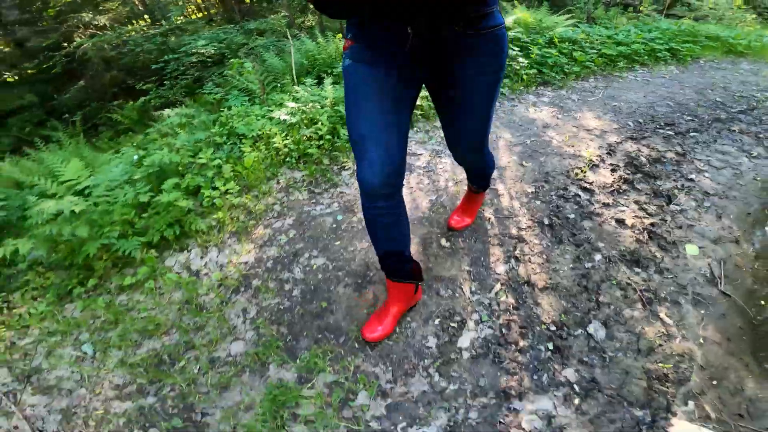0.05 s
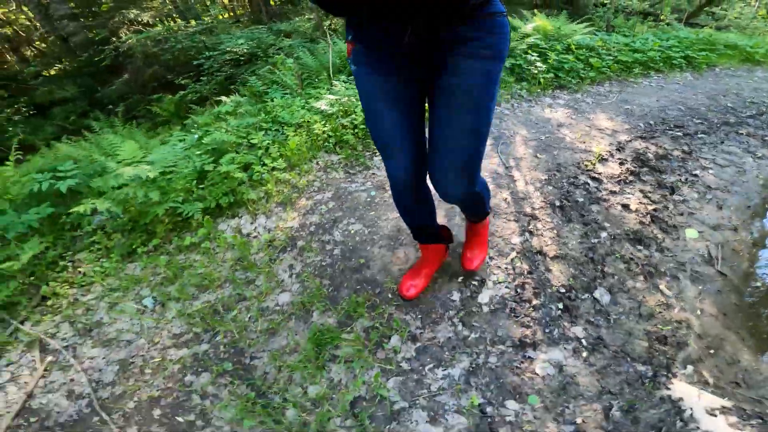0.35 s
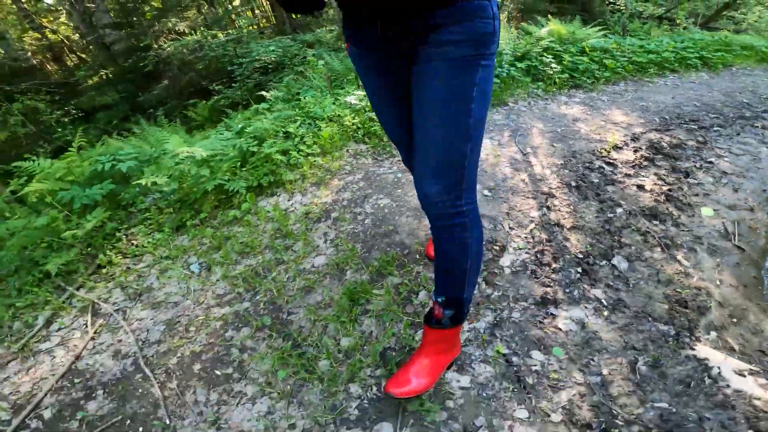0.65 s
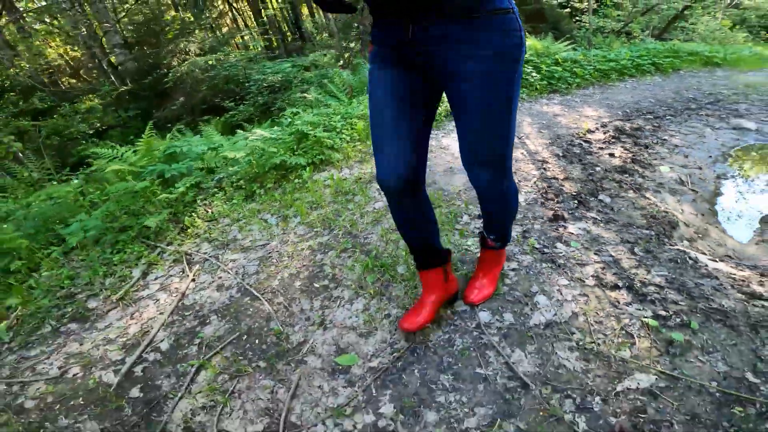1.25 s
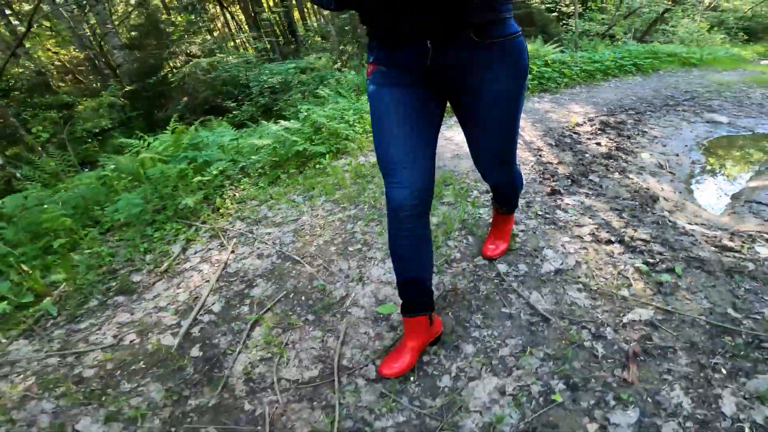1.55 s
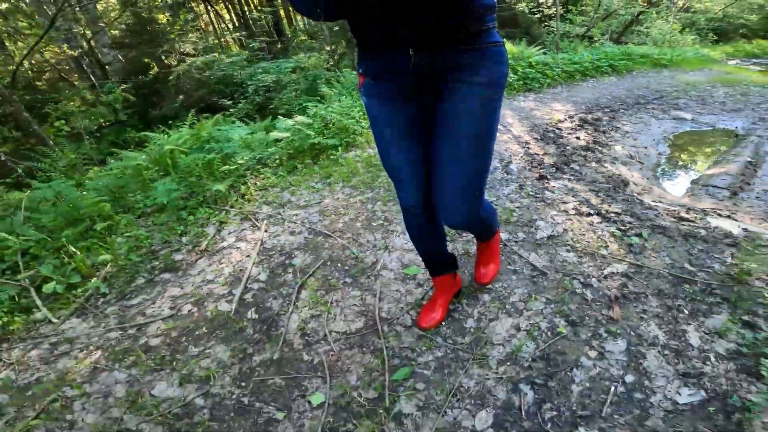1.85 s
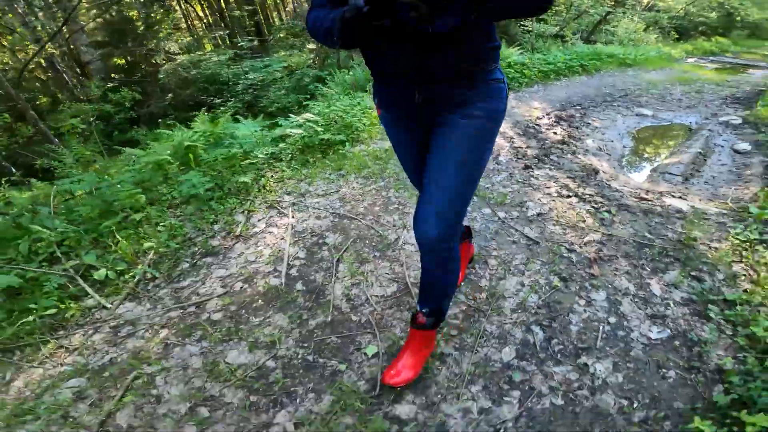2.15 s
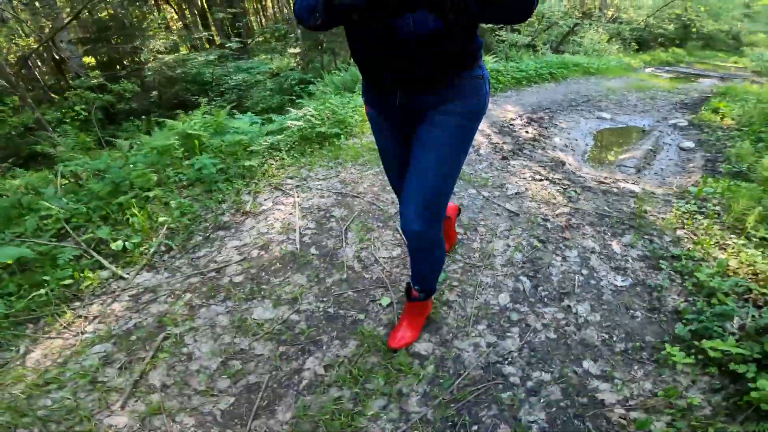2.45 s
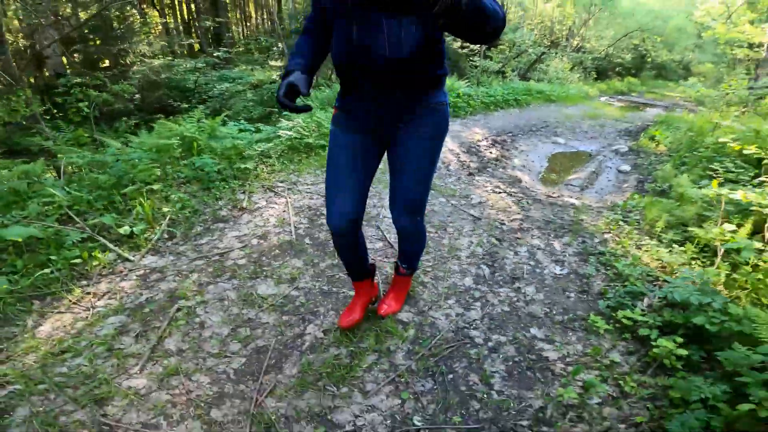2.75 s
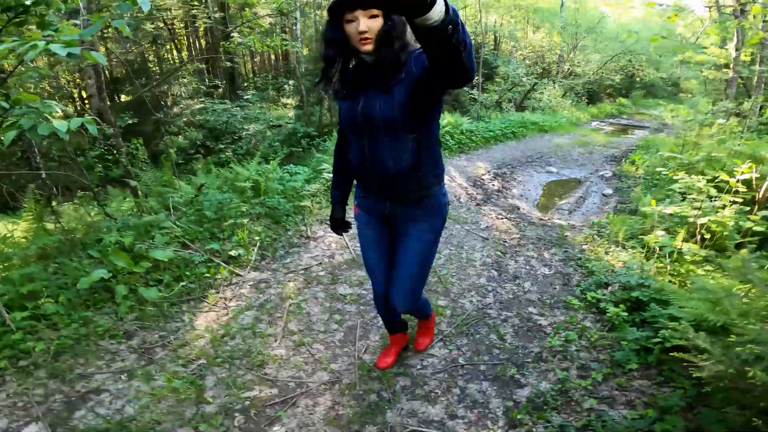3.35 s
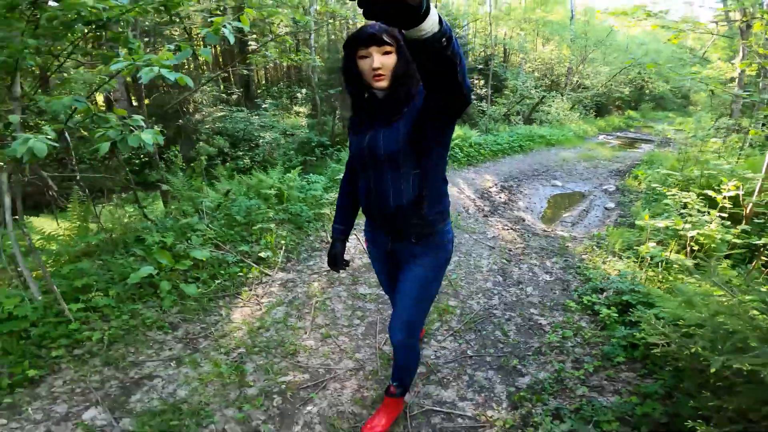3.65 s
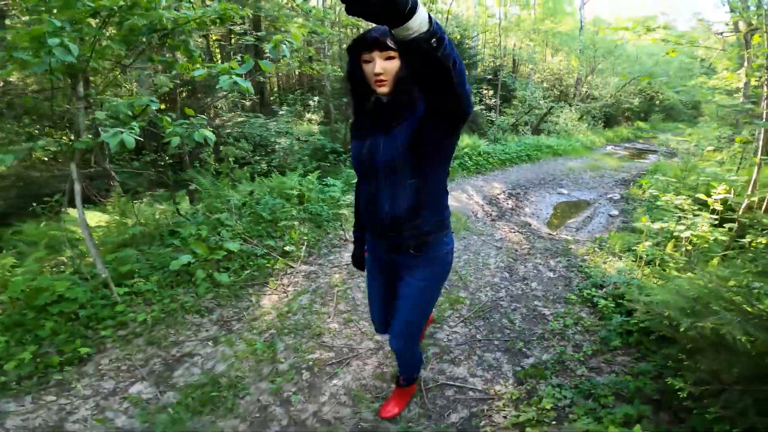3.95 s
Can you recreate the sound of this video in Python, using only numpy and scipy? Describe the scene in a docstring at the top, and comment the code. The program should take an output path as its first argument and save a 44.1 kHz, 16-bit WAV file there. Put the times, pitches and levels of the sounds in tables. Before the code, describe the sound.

A hollow pole creaks and crackles in repeated short bursts, close to the microphone, with dull handling bumps. Underneath, rubber boots scuff leaf litter and snap small twigs on a forest path in faint wind.

```python
"""Forest walk with a creaking pole

Rubber boots on a damp path scuff leaf litter, snap small twigs and pop as their shafts buckle.
The walker carries a hollow pole: it creaks in stick-slip bursts, sings and groans under the glove,
takes soft bumps and shudders at its low bending note. Faint wind stirs the trees, and puffs of air
push on the microphone."""
import sys
import numpy as np
from scipy import signal
from scipy.fft import rfft, irfft, next_fast_len
from scipy.io import wavfile
from scipy.ndimage import map_coordinates

SR = 44100
rng = np.random.default_rng(int(sys.argv[2]) if len(sys.argv) > 2 else 0)


def transcribe(u):
    """Save the signal u as a 16-bit wav file named by the first command-line argument.

    u: samples, shape (n,) or (channels, n), limited to [-1, 1]; the rate is SR.
    q: integer samples, one column per channel.
    """
    v = np.clip(np.atleast_2d(u).T, -1, 1)
    q = np.round(v * 32767).astype(np.int16)
    wavfile.write(sys.argv[1], SR, q)


N = 176400


def amp(db):
    return 10 ** (np.asarray(db) / 20)


def unit_rms(x):
    return x / np.sqrt(np.mean(x ** 2) + 1e-20)


def unit_peak(x):
    return x / np.abs(x).max()


def unit_band(x, low_hz, high_hz):
    """Scale to a spectral rms of 1 within a band."""
    hz = np.fft.rfftfreq(len(x), 1 / SR)
    return x / np.sqrt(np.mean(np.abs(rfft(x)[(hz > low_hz) & (hz < high_hz)]) ** 2))


def curve_at(points, hz):
    """Interpolate (freq_hz, value) points on a log axis."""
    freqs, values = np.transpose(points)
    return np.interp(np.log(hz + 1), np.log(freqs + 1), values)


def clock(size):
    return np.arange(size) / SR


def wobble(rate_hz):
    """Smooth random curve."""
    return map_coordinates(rng.standard_normal(4096), [clock(N) * rate_hz], mode="wrap")


def filtered(x, response):
    """Apply a frequency response."""
    size = next_fast_len(N + SR // 2)
    return irfft(rfft(x, size) * response(np.fft.rfftfreq(size, 1 / SR)), size)[..., :N]


def minimum_phase(gain, size=2048):
    """Causal impulse response of energy 1, shaped by gain(hz)."""
    cepstrum = irfft(np.log(np.maximum(gain(np.fft.rfftfreq(size, 1 / SR)), 1e-6)))
    cepstrum[1:size // 2] *= 2
    cepstrum[size // 2 + 1:] = 0
    impulse = irfft(np.exp(rfft(cepstrum)))
    return impulse / np.linalg.norm(impulse)


def convolve(x, impulse):
    return signal.fftconvolve(np.atleast_2d(x), np.atleast_2d(impulse), axes=1)[:, :N]


def add(track, start_s, sound):
    part = track[..., max(round(start_s * SR), 0):][..., :sound.shape[-1]]
    part += sound[..., :part.shape[-1]]


def swell(start_s, hold_s, attack_s, release_s):
    """Exponential rise up to start_s, hold, exponential fall."""
    t = clock(N)
    return np.exp(-np.maximum(start_s - t, 0) / attack_s - np.maximum(t - start_s - hold_s, 0) / release_s)


def burst(decay_s, size=1024):
    """Decaying noise of energy 1."""
    noise = rng.standard_normal(size) * np.exp(-clock(size) / decay_s)
    return noise / np.linalg.norm(noise)


def grains(rate_hz, spread_db, noise_gain):
    """Two rows of tiny, uneven random impacts on a bed of noise."""
    hits = (rng.random((2, N)) < rate_hz / SR) * rng.choice([-1, 1], (2, N))
    sizes = amp(spread_db * np.clip(rng.standard_normal((2, N)), -2, 2))
    return unit_rms(hits * sizes) + noise_gain * rng.standard_normal((2, N))


# Stereo likeness: freq_hz, correlation
COHERENCE = [(60, 0.73), (300, 0.63), (2000, 0.9), (5000, 0.53), (12000, 0.17)]
# Stereo balance: freq_hz, left_minus_right_db
BALANCE = [(60, -2), (200, 2), (400, -4.5), (800, -0.5), (1300, 0), (2400, 2.5), (4400, 1.5), (9000, -2.5)]


def stereo(pair, spectrum):
    """Colour two unrelated rows and blend them into stereo of rms 1."""
    def mid_side_gain(hz):
        angle = np.arccos(np.clip(curve_at(COHERENCE, hz), -1, 1)) / 2
        return amp(curve_at(spectrum, hz)) * [np.cos(angle), np.sin(angle)]

    mid, side = filtered(pair, mid_side_gain)
    left_right = np.array([mid + side, mid - side])
    return unit_rms(filtered(left_right, lambda hz: amp(np.outer([.5, -.5], curve_at(BALANCE, hz)))))


# Wind spectrum: freq_hz, gain_db
WIND_SPECTRUM = [(25, -3.5), (55, -12.5), (110, -26.5), (190, -15.5), (300, -25.5), (650, -29), (900, -30),
                 (1200, -24), (1600, -28), (2700, -26.5), (3900, -30.5), (6200, -37.5), (9000, -45.5),
                 (15500, -61)]
# Crisp leaf spectrum: freq_hz, gain_db
LEAF_SPECTRUM = [(2000, -43), (4500, -5), (7000, 1.5), (9000, -2.5), (10500, -9), (12500, -7.5),
                 (15500, -49)]


def forest_wind(wind_db=-53, ticks_db=-80):
    """Faint wind in the trees, with sparse ticks of leaves."""
    wind = amp(wind_db + wobble(5.32)) * stereo(rng.standard_normal((2, N)), WIND_SPECTRUM)
    ticks = stereo(grains(rate_hz=40, spread_db=15, noise_gain=.05), LEAF_SPECTRUM)
    return wind + amp(ticks_db) * ticks


# Crushed litter spectrum: freq_hz, gain_db
CRUNCH_SPECTRUM = [(200, -13.5), (650, -2.5), (1250, 5.5), (1600, -2), (3000, -2), (3850, -3), (4600, -7.5),
                   (7000, -15), (11000, -35)]
# Boot scuffs: start_s, hold_s, crunch_db, hiss_db
BOOT_SCUFFS = [(0, 0.28, -54.5, -71.5), (0.293, 0.052, -60, -70), (0.898, 0.032, -50, -56.5),
               (0.983, 0.046, -48.5, -59), (1.07, 0.1, -62.5, -71.5), (1.212, 0.15, -62, -68),
               (1.506, 0.11, -50, -67.5), (1.657, 0.044, -54.5, -68), (1.74, 0.016, -52, -60.5),
               (1.822, 0.056, -50, -72), (2.037, 0.05, -46, -56.5), (2.235, 0.15, -61, -66.5),
               (2.37, 0.13, -58, -70), (2.507, 0.18, -53.5, -78), (2.844, .13, -59, -69.5),
               (3.0, 0.21, -52, -75), (3.106, 0.013, -64, -60), (3.241, 0.32, -60.5, -68),
               (3.846, 0.085, -56, -69.5), (3.937, 0.057, -55, -69)]


def boot_scuffs(attack_s=0.0071, release_s=0.032):
    """Each scuff crushes leaves and grit."""
    crunch = stereo(grains(rate_hz=1000, spread_db=5, noise_gain=.6), CRUNCH_SPECTRUM)
    crunch *= amp(2 * wobble(70))
    hiss = stereo(grains(rate_hz=700, spread_db=6, noise_gain=.5), LEAF_SPECTRUM)
    hiss *= amp(2.5 * wobble(70))
    return sum(swell(start_s, hold_s, attack_s, release_s) * (amp(crunch_db) * crunch + amp(hiss_db) * hiss)
               for start_s, hold_s, crunch_db, hiss_db in BOOT_SCUFFS)


# Pole body modes: freq_hz, gain_db, t60_s, left_minus_right_db
BODY_MODES = [(171.4, -10.5, 0.45, 7), (217.7, -2, 0.22, -5.5), (354, -11, .18, -14),
              (472.6, -5.5, 0.13, -9.5), (510.7, -13.5, 0.093, -30.5), (585.7, -6, 0.21, -1.5),
              (709, -20.5, 0.062, -32), (811, 1, 0.071, -11.5), (872, -2.5, 0.052, -20.5),
              (987.3, 3.5, 0.067, -1.5), (1061, 1.5, 0.078, -6.5), (1159.5, -5, 0.065, -4),
              (1148, -29, 0.11, 37), (1300, -50, .1, -32)]
# Pole upper modes: freq_hz, gain_db, t60_s, left_minus_right_db
UPPER_MODES = [(1930, -4.5, 0.09, -12), (2031, 10, 0.034, 0), (2650, 4, 0.11, -17), (2880, 14, 0.017, 0),
               (2895, 4.5, 0.013, 6), (3266, -5.5, 0.031, 27), (3764, 10.5, 0.035, -3.5),
               (4435, -3.5, 0.059, 1), (6420, -11, 0.005, 55)]


def pole_ring(modes, left_lag_s, low_hz=135, travel_s=0.0009):
    """Stereo impulse response of the pole; low bending waves arrive later than high ones."""
    out = 0
    for hz, gain_db, t60_s, pan_db in modes:
        t = np.maximum(clock(SR // 3) - [[left_lag_s], [0]] - travel_s * np.sqrt(low_hz / hz), 0)
        stereo_db = gain_db + np.array([[pan_db / 2], [-pan_db / 2]])
        out = out + amp(stereo_db - 60 * t / t60_s) * np.sin(2 * np.pi * hz * t)
    return signal.sosfilt(signal.butter(2, low_hz, "high", fs=SR, output="sos"), out)


# Light glove slides: start_s, hold_s, level_db, centre_hz
GLOVE_SLIDES = [(0, 0.22, -59, 2240), (0.013, .22, -58.5, 3960), (.85, 0.11, -57.5, 1250),
                (2.125, 0.011, -46.5, 3630), (3.918, 0.035, -62, 3900)]


def glove_slides(width_octaves=0.28, attack_s=0.0032, release_s=0.0059):
    """Smooth friction makes a few of the pole's resonances sing."""
    singing = convolve(rng.standard_normal(N), pole_ring(BODY_MODES + UPPER_MODES, left_lag_s=.00002))
    out = np.zeros((2, N))
    for start_s, hold_s, level_db, centre_hz in GLOVE_SLIDES:
        band = filtered(singing, lambda hz: np.exp(-(np.log2((hz + 1) / centre_hz) / width_octaves) ** 2))
        out += amp(level_db) * swell(start_s, hold_s, attack_s, release_s) * unit_rms(band)
    return out


# Air puffs: centre_s, level_db, pitch_hz, half_width_s
AIR_PUFFS = [(0.058, -26.5, 34.8, 0.0062), (0.12, -38, 29.5, 0.068), (0.276, -36.5, 25.3, 0.041),
             (2.294, -45.5, 40, 0.01), (2.431, -37.5, 40, 0.011), (2.545, -39.5, 16, 0.093),
             (2.63, -36, 28, 0.064), (2.775, -35, 27, 0.042), (3.175, -31, 43, 0.054),
             (3.3, -34, 35.1, 0.07), (3.974, -37.5, 48, 0.051)]


def air_puffs():
    """Air pushes on the microphone in deep pulses, stronger on the right."""
    out, t = np.zeros(N), clock(N)
    for centre_s, level_db, pitch_hz, half_width_s in AIR_PUFFS:
        envelope = amp(level_db) * np.exp(-((t - centre_s) / half_width_s) ** 2)
        out += envelope * np.sin(2 * np.pi * (pitch_hz * t + rng.random()))
    return out * amp([[-2], [2]])


# Twig and grit snaps: start_s, peak_db, centre_hz
TWIG_SNAPS = [(0.125, -38, 9000), (0.1293, -23, 2650), (0.34, -28.5, 2430), (.537, -42, 2980),
              (.609, -44.5, 1800), (.7365, -42, 1570), (.854, -41, 4800), (1.142, -41, 4700),
              (1.29, -40, 5200), (1.698, -39, 2330), (2.018, -37.5, 4000), (2.06, -34, 5170),
              (2.079, -44, 4560), (2.526, -36, 3680), (2.546, -37, 3730), (2.248, -43, 5230),
              (2.378, -40, 3470), (2.438, -48, 4000), (2.492, -31, 2020), (2.821, -43.5, 3350),
              (3.452, -42, 4070), (3.9736, -31.5, 1950), (3.986, -35.5, 3700)]


def twig_snaps(decay_s=0.0012, width_octaves=0.76):
    """Twigs and grit break in short cracks, each with its own pitch."""
    out = np.zeros((2, N))
    for start_s, peak_db, centre_hz in TWIG_SNAPS:
        def band_gain(hz):
            band = 1 / (1 + (np.log2((hz + 1) / centre_hz) / width_octaves) ** 4)
            return band / (1 + (hz / (2.2 * centre_hz)) ** 4)

        crack = burst(decay_s)
        crack[0] += .4  # leading click
        add(out, start_s, amp(peak_db) * unit_peak(convolve(crack, minimum_phase(band_gain))))
    return out


# Soft bumps on the pole: start_s, peak_db, contact_s
POLE_BUMPS = [(.339, -24.5, 0.0021), (0.353, -39, 0.0036), (.381, -27, .002), (0.819, -45, 0.0023),
              (1.386, -45, 0.0027), (2.644, -27, .002), (3.204, -27, 0.0023), (3.292, -32, 0.0027)]


def pole_bumps(band_hz=(150, 290), damping_s=0.015):
    """A soft push reaches only the lowest modes, and the hand damps them at once."""
    out, t = np.zeros((2, N)), clock(1024)
    body = pole_ring(BODY_MODES, left_lag_s=0.00033)
    damped = body * np.exp(-clock(body.shape[1]) / damping_s)
    low_modes = signal.sosfilt(signal.butter(3, band_hz, "band", fs=SR, output="sos"), damped)
    for start_s, peak_db, contact_s in POLE_BUMPS:
        push = np.sin(np.pi * np.minimum(t / contact_s, 1)) ** 2
        thud = convolve(push, low_modes)[:, :SR // 4]
        add(out, start_s, amp(peak_db) * unit_peak(thud))
    return out


# Hand drags on the pole: start_s, hold_s, groan_db, rasp_db
HAND_DRAGS = [(0.341, 0.055, -34, -46.5), (0.776, 0.03, -45, -46.5), (1.023, 0.043, -46, -39),
              (1.215, .18, -58, -64), (1.479, 0.1, -37, -35), (1.751, 0.03, -52, -60),
              (1.798, 0.01, -43, -40.5), (1.85, 0.052, -43, -38), (2.051, 0.079, -45.5, -53.5),
              (2.521, 0.13, -48, -54.5), (2.646, 0.1, -48, -60.5), (2.833, 0.083, -51, -62),
              (2.953, 0.12, -47.5, -55), (3.06, 0.15, -37, -61), (3.233, 0.027, -40, -53),
              (3.295, 0.072, -37.5, -63), (3.481, 0.066, -49, -84), (3.736, .1, -63.5, -70),
              (3.871, 0.15, -46.5, -57)]


def hand_drags(groan_below_hz=270, rasp_above_hz=450, attack_s=0.0019, release_s=0.026):
    """Dense micro-slips keep the pole groaning and rasping while the grip moves."""
    body = pole_ring(BODY_MODES, left_lag_s=0.00031)
    groan = convolve(grains(rate_hz=600, spread_db=4.8, noise_gain=0.41)[0], body)
    groan = unit_rms(filtered(groan, lambda hz: 1 / (1 + (hz / groan_below_hz) ** 3)))
    rasp = convolve(grains(rate_hz=400, spread_db=2.4, noise_gain=0.13)[0], body)
    rasp = unit_rms(filtered(rasp, lambda hz: hz ** 2 / (hz ** 2 + rasp_above_hz ** 2)))
    return sum(swell(start_s, hold_s, attack_s, release_s) * (amp(groan_db) * groan + amp(rasp_db) * rasp)
               for start_s, hold_s, groan_db, rasp_db in HAND_DRAGS)


# Pole shudders: start_s, hold_s, level_db
POLE_SHUDDERS = [(.345, 0.037, -43), (0.806, 0.0078, -50.5), (1.091, 0.013, -46), (1.515, 0.099, -41.5),
                 (1.84, 0.1, -56), (2.069, 0.087, -48), (2.409, 0.025, -42), (2.654, 0.056, -36.5),
                 (2.77, 0.014, -39), (3.071, 0.056, -22.5), (3.163, 0.032, -25.5), (3.3, 0.061, -29),
                 (3.476, 0.088, -40.5), (3.944, 0.0085, -34.5)]


def pole_shudders(pitch_hz=64.8, attack_s=0.021, release_s=0.024):
    """The pole shakes at its low bending note, wavering slightly."""
    envelope = np.max([amp(level_db) * swell(start_s, hold_s, attack_s, release_s)
                       for start_s, hold_s, level_db in POLE_SHUDDERS], axis=0)
    bending = np.sqrt(2) * np.sin(2 * np.pi * pitch_hz * clock(N) + wobble(22))
    return envelope * bending * amp([[-.6], [.6]])


# Slip crack spectrum: freq_hz, gain_db
CRACK_SPECTRUM = [(300, -13.5), (900, 18), (1250, -16.5), (1500, -40.5), (2100, 10.5), (3800, -3),
                  (4600, 2), (7000, -8), (9500, -14), (15000, -51)]
# Slips of the creaking pole: start_s, kick_db, scrape_db
POLE_SLIPS = [(0.383, -21.5, -51), (0.39, -47, -60), (0.775, -26, -55), (0.789, -15.5, -42.5),
              (0.803, -20, -44.5), (1.014, -28, -37), (1.024, -18, -44), (1.031, -15.5, -44),
              (1.04, -19, -44), (1.046, -9, -44), (1.054, -16, -53), (1.06, -16, -54), (1.074, -40, -50),
              (1.09, -14, -52), (1.104, -19.5, -41), (1.11, -16.5, -61), (1.478, -20.5, -32),
              (1.488, -29, -31), (1.493, -20, -51), (1.501, -46, -57), (1.513, -19, -39), (1.526, -16, -48),
              (1.534, -10, -35), (1.538, -20, -43), (1.552, -27, -35), (1.562, -16, -35),
              (1.573, -16.5, -35.5), (1.588, -17, -44), (1.602, -16.5, -59), (1.612, -52, -63),
              (1.8, -20.5, -34), (1.808, -50, -46), (1.837, -32, -35.5), (1.851, -18, -31),
              (1.86, -17.5, -37), (1.871, -24, -41), (1.879, -15.5, -43), (1.888, -18, -47),
              (1.897, -24, -45), (1.923, -16, -47), (1.932, -38, -52), (2.049, -30, -59), (2.06, -24, -43),
              (2.078, -24, -34), (2.095, -23.5, -36.5), (2.131, -49, -44), (2.492, -35, -42),
              (2.525, -22, -35.5), (2.535, -30, -47), (2.546, -25.5, -39.5), (2.573, -29.5, -39.5),
              (2.641, -19, -57), (2.648, -33, -71), (3.004, -20, -40), (3.016, -21, -52), (3.028, -43, -56),
              (3.04, -28, -51), (3.053, -47, -41.5), (3.067, -46, -43), (3.082, -37, -45),
              (3.097, -18.5, -40), (3.118, -18, -55), (3.148, -21.5, -50), (3.155, -21, -40.5),
              (3.184, -14.5, -40), (3.29, -19.5, -38), (3.319, -21, -37), (3.858, -56, -57),
              (3.934, -35, -49), (3.952, -32, -51)]


def pole_creaks(body_gain_db=-6.5, upper_gain_db=16, crack_gain_db=17):
    """Stick-slip: each slip kicks the body modes; its short scrape rings and cracks in the treble."""
    kicks, scrapes = np.zeros(N), np.zeros(N)
    for start_s, kick_db, scrape_db in POLE_SLIPS:
        kick, scrape = 0.64 * burst(decay_s=0.0026), burst(decay_s=0.0021)
        kick[0] += 1  # leading clicks
        scrape[0] += .5
        add(kicks, start_s, amp(kick_db) * unit_band(kick, low_hz=700, high_hz=1250))
        add(scrapes, start_s, amp(scrape_db) * unit_band(scrape, low_hz=1800, high_hz=5000))
    body = pole_ring(BODY_MODES, left_lag_s=.00005)
    upper = pole_ring(UPPER_MODES, left_lag_s=.00002)
    crack = minimum_phase(lambda hz: amp(curve_at(CRACK_SPECTRUM, hz)))
    return (amp(body_gain_db) * convolve(kicks, unit_peak(body))
            + amp(upper_gain_db) * convolve(scrapes, upper / np.linalg.norm(upper[0]))
            + amp(crack_gain_db) * convolve(scrapes, crack))


# Rubber slap spectrum: freq_hz, gain_db
SLAP_SPECTRUM = [(350, -17), (600, -12.5), (800, 2), (1150, 4), (1350, -16.5), (1550, -0.5), (2000, -18),
                 (3300, -20.5), (4500, -33.5), (12000, -49)]
# Boot pops: start_s, peak_db, pitch_hz
BOOT_POPS = [(.929, -33, 1030), (0.94, -35.5, 1290), (.980, -35, 863), (1.666, -34.5, 920),
             (1.67, -28, 1010), (1.677, -21, 902), (1.732, -40.5, 1234), (2.394, -43, 1030),
             (3.858, -44, 1090)]


def boot_pops(t60_s=0.03, overtone_ratio=3.4, overtone_db=-10, slap_gain=6.85):
    """The rubber shaft of a boot buckles with a hollow pop."""
    out, t = np.zeros(N), clock(2048)
    rubber = minimum_phase(lambda hz: amp(curve_at(SLAP_SPECTRUM, hz)))
    for start_s, peak_db, pitch_hz in BOOT_POPS:
        phase = 2 * np.pi * pitch_hz * t
        tone = amp(-60 * t / t60_s) * (np.sin(phase) + amp(overtone_db) * np.sin(overtone_ratio * phase))
        slap = convolve(burst(decay_s=0.0021), rubber)[0, :len(t)]
        add(out, start_s, amp(peak_db) * unit_peak(tone + slap_gain * slap))
    return out


def echo(sound, gain_db=-15.5, t60_s=0.067, cutoff_hz=6000):
    """A short, diffuse tail with softened treble."""
    noise = filtered(rng.standard_normal((2, N)), lambda hz: 1 / (1 + (hz / cutoff_hz) ** 2))
    tail = noise[:, :SR // 2] * amp(-60 * clock(SR // 2) / t60_s)
    return amp(gain_db) * convolve(sound, tail / np.linalg.norm(tail[0]))


def scene():
    """Creaks and footfalls with their echo, plus pole handling and moving air."""
    near = pole_creaks() + boot_scuffs() + boot_pops() + twig_snaps()
    near += echo(near)
    handling = hand_drags() + glove_slides() + pole_bumps() + pole_shudders()
    return near + handling + air_puffs() + forest_wind()


def record(dry, top_hz=15750, left_lag_s=.000018):
    """Band limit; the left channel lags the right slightly."""
    half_lags_s = np.array([left_lag_s, -left_lag_s]) / 2
    return filtered(dry, lambda hz: (hz < top_hz) * np.exp(-2j * np.pi * np.outer(half_lags_s, hz)))


dry = scene()
out = record(dry)
transcribe(out)
```